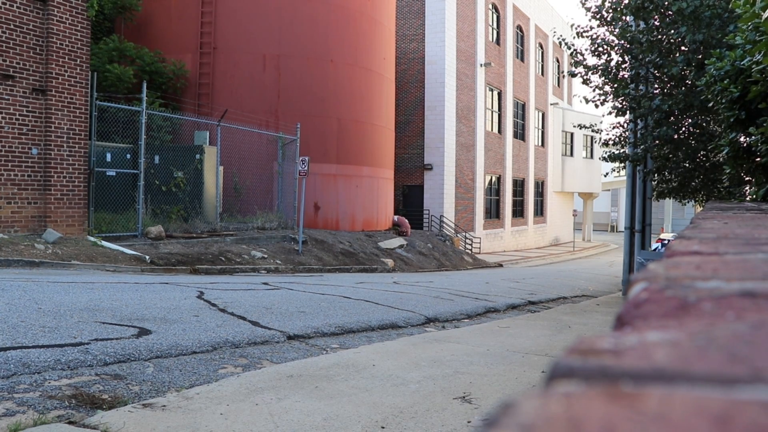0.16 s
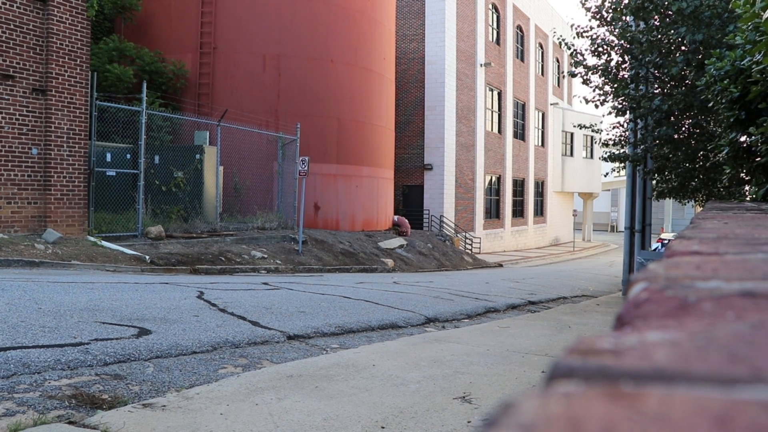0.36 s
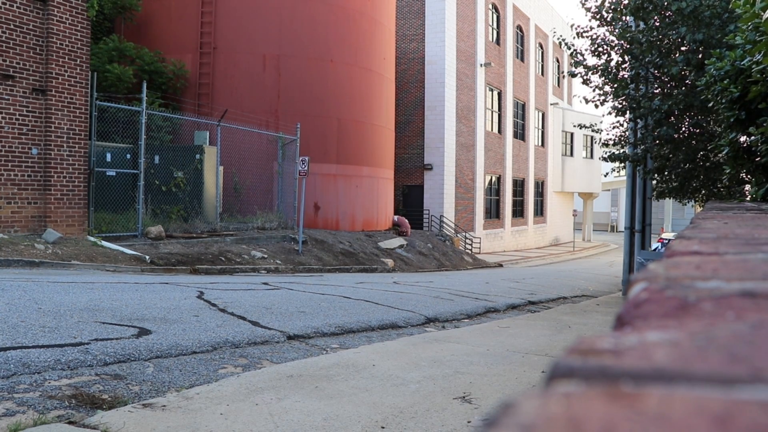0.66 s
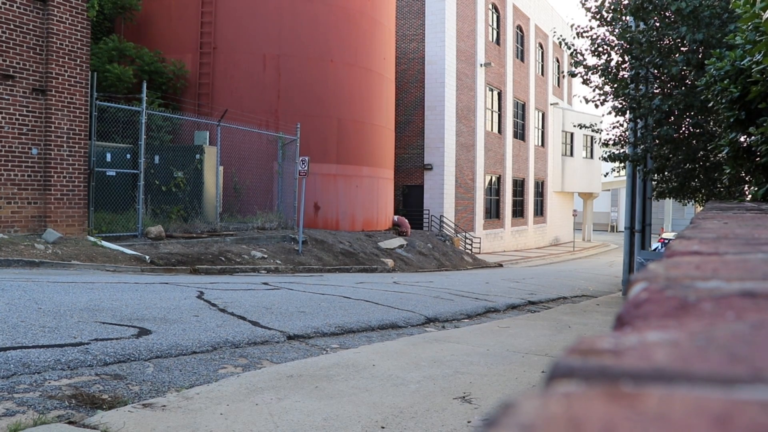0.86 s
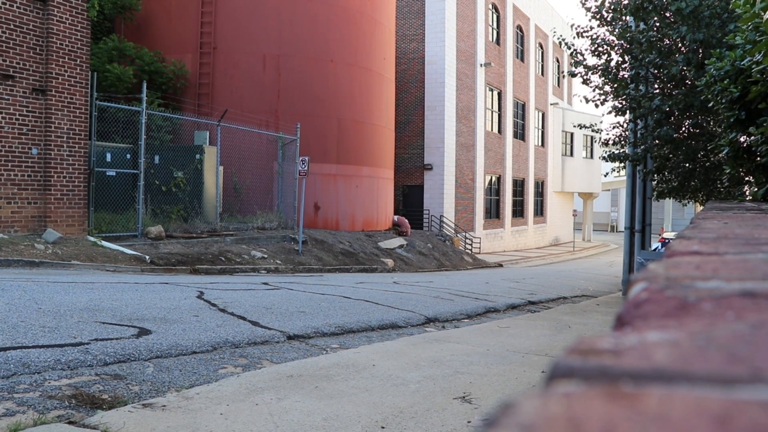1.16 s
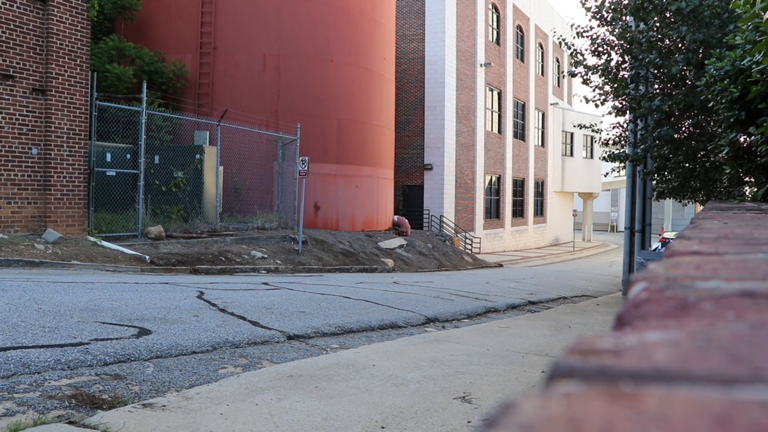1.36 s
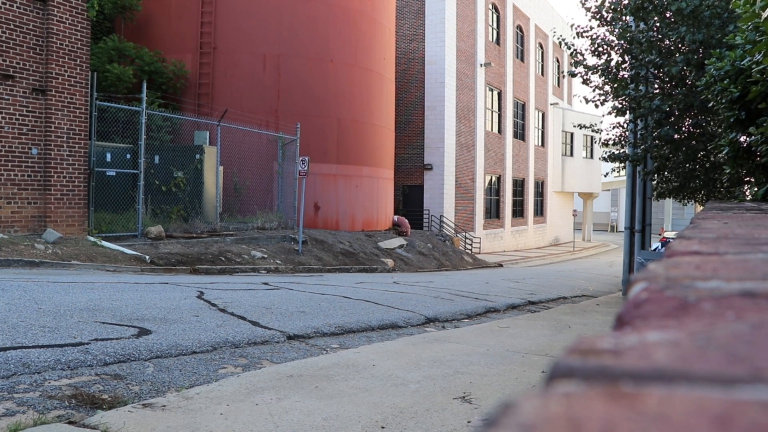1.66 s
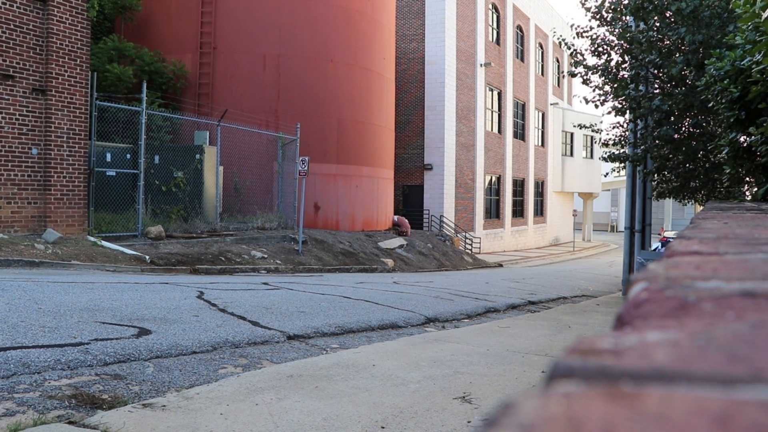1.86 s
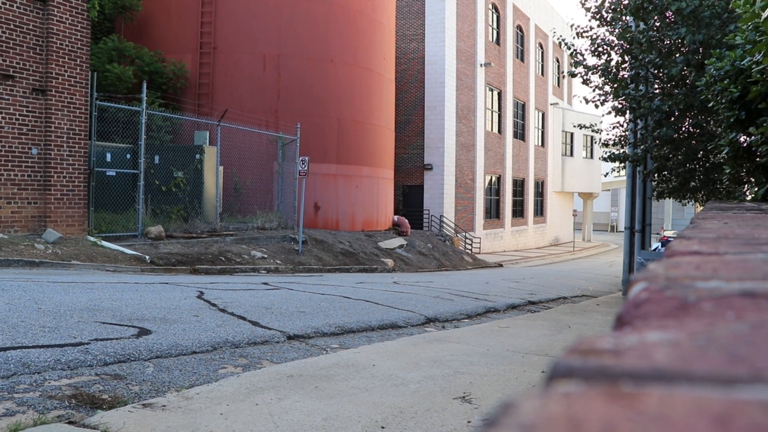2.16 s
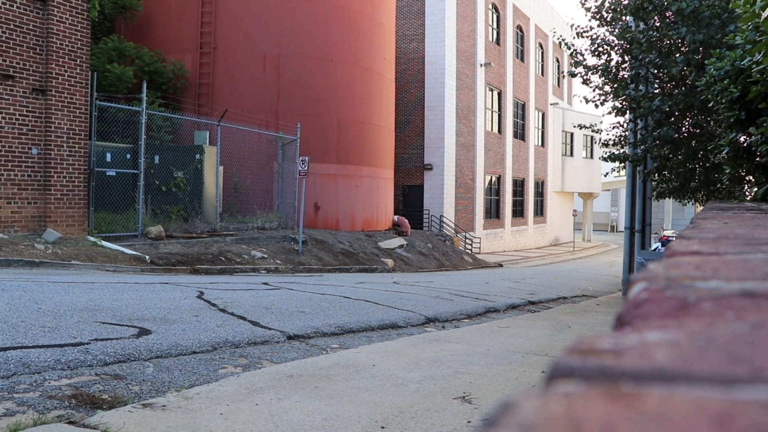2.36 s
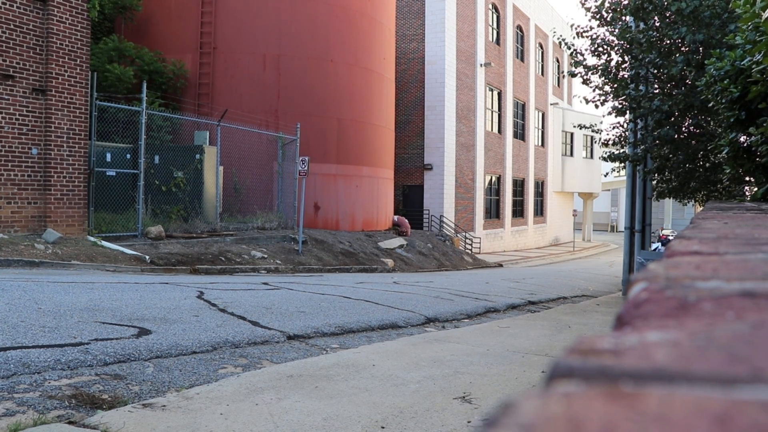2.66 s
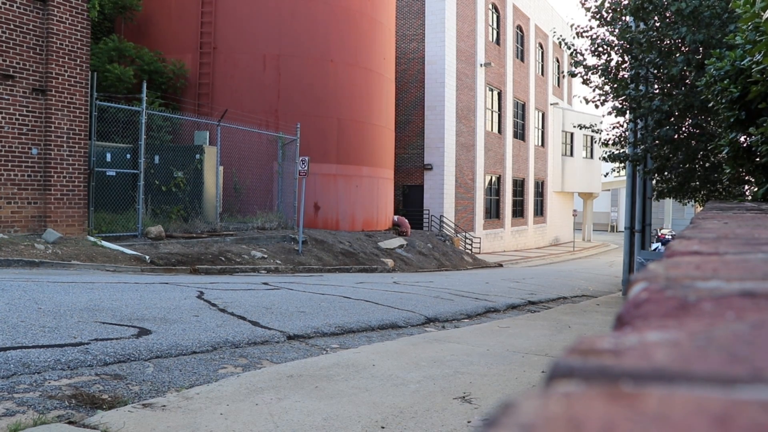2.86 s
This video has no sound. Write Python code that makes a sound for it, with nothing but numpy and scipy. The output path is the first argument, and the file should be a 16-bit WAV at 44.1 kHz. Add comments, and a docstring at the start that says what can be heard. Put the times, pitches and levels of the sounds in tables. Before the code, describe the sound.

An unseen car with a loud exhaust pulls away, its low throbbing drone rising in pitch and loudness, turning raspier near the end, echoing off alley walls over faint machinery hum and small grit clicks.

```python
"""An alley between factory buildings, where an unseen car with a loud exhaust pulls away from low revs.
Its engine orders are climbing sine tones: throb and drone swell and fade by drawn level curves,
the higher ones through fixed resonances of pipe and walls. Pulsed noise makes the gas, which rasps as
the load rises; decaying noise tails make the wall echoes. A little grit cracks and crunches in clicks and
short noise bands, while plant machinery hums and whines in wavering tones over a bed of shaped noise."""
import sys
import numpy as np
from scipy import signal
from scipy.fft import rfft, irfft
from scipy.io import wavfile
from scipy.ndimage import map_coordinates

SR = 44100
rng = np.random.default_rng(int(sys.argv[2]) if len(sys.argv) > 2 else 0)


def wrap_up_sound(samples):
    """Save the sound to the file named by the first command line argument, as 16-bit audio."""
    columns = np.atleast_2d(samples).T
    # keep every value between -1 and 1, then stretch to whole-number steps
    tamed = np.clip(columns, -1, 1)
    steps = np.round(tamed * 32767).astype(np.int16)
    wavfile.write(sys.argv[1], SR, steps)


N = 132300  # samples, 3 s

# Engine speed: (time [s], exhaust beat rate [Hz])
BEAT_RATE = [(0.0, 37.87), (0.3, 39.02), (0.45, 38.73), (0.75, 42.78), (1.05, 47.24), (1.2, 48.56),
             (1.5, 50.4), (1.65, 52.5), (1.8, 53.57), (1.95, 56.1), (2.25, 62.22), (2.55, 68.5),
             (3.0, 80.16)]
# Engine effort, driving the higher orders: (time [s], relative level [dB])
EFFORT = [(0, -12.5), (.8, -8), (1.4, -10.5), (2, -5), (2.4, 0), (2.75, 0), (3, 0)]
# Drawn swells and fades of the throb, the lowest note: (time [s], level [dB])
THROB_LEVEL = [(0, -48), (.61, -40), (1.17, -42), (1.32, -33), (1.46, -47), (1.59, -33), (1.64, -58),
               (1.73, -35), (2.06, -29), (2.15, -46), (2.34, -25.5), (2.43, -53), (2.49, -29.5),
               (2.75, -26.5), (2.85, -33), (3, -24.5)]
# Drawn swells and fades of the drone, an octave above the throb: (time [s], level [dB])
DRONE_LEVEL = [(0, -50), (.09, -43), (.39, -40), (.66, -31.5), (.82, -35), (.9, -31.5), (1.61, -29),
               (1.83, -22), (1.93, -25), (1.98, -35), (2.05, -24.5), (2.13, -32.5), (2.17, -22),
               (2.33, -23), (2.41, -28), (2.47, -17.5), (2.57, -27), (2.64, -16.5), (2.68, -24.5),
               (2.81, -22), (3, -33)]
# Higher engine orders, the halves from unequal cylinders: (multiple of the beat [ratio], relative level [dB])
ENGINE_ORDERS = [(1.5, -4), (2.5, -7.5), (3, 7), (3.5, -8), (4, 7), (4.5, -6.5), (5, 3), (5.5, -6),
                 (6, -2.5), (6.5, -7), (7, -3), (7.5, -8), (8, -4), (9, -8), (10, -8), (11, -8.5),
                 (12, -10)]
# Tilt of the top orders: (time [s], slope [dB per octave])
BRIGHTNESS_TILT = [(0, 0), (2.3, -10.5), (2.6, 3), (3, 5)]
# Resonances of pipe and alley, for the higher orders: (frequency [Hz], gain [dB])
RESONANCES = [(55, -48), (80, -47), (102, -37), (112, -35), (117, -42.5), (122, -34.5), (129, -28),
              (137, -31), (143, -37.5), (147, -29), (153, -32), (158, -42), (162, -34), (168, -39.5),
              (176, -46.5), (190, -59.5), (218, -48), (238, -44.5), (254, -39), (268, -36), (277, -48.5),
              (295, -46), (320, -51), (365, -41), (400, -41.5), (440, -49), (505, -44.5), (560, -52.5),
              (625, -40), (690, -52.5), (900, -67)]
# Colour of the rushing gas: (frequency [Hz], relative level [dB per Hz])
GAS_COLOUR = [(60, 4), (120, 6), (170, -1), (200, 0), (300, -3.5), (375, 8), (450, -7.5), (600, -11),
              (900, -21.5), (1350, -21.5), (2000, -30), (4000, -61.5)]
# Loudness of the rush: (time [s], level [dB])
GAS_RUSH_LEVEL = [(0, -51), (1.4, -54.5), (2, -40), (2.4, -35), (2.75, -37), (3, -33)]
# Colour of the gas rasp: (frequency [Hz], relative level [dB per Hz])
RASP_COLOUR = [(300, -32), (480, 3.5), (680, -4.5), (900, -4), (1350, -3.5), (1800, -16), (2400, -14.5),
               (3800, -22), (5000, -40)]
# Loudness of the rasp: (time [s], level [dB])
GAS_RASP_LEVEL = [(0, -60.5), (1.898, -52), (2.4, -48.5), (2.7, -47.5), (3, -41.5)]
# Grit cracking: (time [s], level before colouring [dB], left over right [dB])
GRIT_CRACKS = [(1.4987, -11, -2), (1.5028, -25, 0), (1.5072, -9, -2), (1.5415, -24, 0)]
# Colour of the cracks: (frequency [Hz], gain [dB])
CRACK_TONE = [(200, -10), (900, 3), (2500, -2), (4000, -8), (5000, -25), (12000, -38)]
# Soft crunches: (time [s], spread [s], centre [Hz], centre to -12 dB [octaves], level [dB])
GRIT_CRUNCHES = [(.612, .011, 1300, .6, -42), (.62, .012, 3200, .5, -57), (.79, .015, 2400, .25, -55),
                 (.92, .008, 2300, .13, -47.5), (.963, .009, 1100, .7, -44.5), (1.43, .008, 2700, .25, -58),
                 (2.87, .006, 2200, .2, -51)]
# Machinery hum: (frequency [Hz], level [dB])
MOTOR_HUM = [(46, -39.5), (120, -49), (168, -47), (377, -54), (479, -55), (823.6, -63), (1222, -61),
             (1302, -65)]
# Thin whine of a fan: (frequency [Hz], relative level [dB])
FAN_WHINE = [(2945, -76), (3832, -72), (3945, -78), (4055, -80), (4167, -80), (4280, -81)]
# Fade of the fan whine: (time [s], gain [dB])
FAN_LEVEL = [(0, 2), (.8, -.5), (1.8, -2), (3, -4)]
# Colour of the yard air: (frequency [Hz], relative level [dB per Hz])
AIR_COLOUR = [(18, -51), (30, -3.5), (85, -7), (140, 2), (156, -24.5), (202, -10.5), (350, -9.5),
              (431, -17.5), (655, -21.5), (828, -21.5), (995, -23.5), (1260, -20), (1400, -24),
              (2550, -36.5), (3580, -38.5), (3970, -42), (4900, -48), (8260, -44.5), (15500, -53.5)]
# Stereo width of air, gas and machinery: (frequency [Hz], side against middle [dB])
SIDE_COLOUR = [(40, -21), (120, -15.5), (300, -13), (600, -5.5), (1200, -4), (2200, 1.5), (4000, 3),
               (6000, 2.5), (15000, -2.7)]

UPPER_DB, BRIGHT_FROM_HZ = 3.5, 330
WAVER_DB, WAVER_RAD = 2.75, .07  # spread of level; spread of phase, times root of the order
FIRING_ROUGH = .04  # spread of the firing strength, as a fraction
LOW_PAN_DB, UPPER_PAN_DB = .5, 1.2  # left over right
GAS_PULSING, GAS_WIDTH_DB = .27, -2  # depth of the puffs, 0 to 1; gain of the side
LOW_ECHO_DB, ALLEY_DB = -4, -10.5  # send of the two low notes; gain of all echoes
ALLEY_T60_S, ALLEY_DELAY_S, ALLEY_WIDE_HZ = 1, .0274, 705
CRACK_TAIL_S, CRACK_TAIL_DB = .01, -31  # decay constant; scatter against the click
CRUNCH_GRAIN = .6  # depth of the random grain, in log amplitude
HUM_WAVER_DB, HUM_WAVER_RAD = .5, .27  # phase wander is for a 100 Hz tone, growing as root frequency
WHINE_WAVER_DB, WHINE_WAVER_RAD = 3, .29
AIR_DB, AIR_FLUTTER_DB = -37, 1.4
LOW_CUT_HZ, TOP_HZ = 37.3, 15500


def amp(db):
    """Decibels to gain."""
    return 10 ** (np.asarray(db) / 20)


def curve(rows):
    """Draw straight lines through (time [s], value) rows, one value a sample."""
    return np.interp(np.arange(N) / SR, *np.array(rows, float).T)


def gain_at(rows, hz):
    """Read gains off a (frequency [Hz], gain [dB]) table, along log frequency."""
    f, db = np.array(rows, float).T
    return amp(np.interp(np.log(np.maximum(hz, 1)), np.log(f), db))


def colour(x, rows):
    """Filter the spectrum by a (frequency [Hz], gain [dB]) table."""
    bins_hz = np.arange(N + 1) * SR / (2 * N)
    spectrum = rfft(x, 2 * N) * gain_at(rows, bins_hz)
    return irfft(spectrum)[..., :N]


def unit(x):
    """Scale to rms 1."""
    return x / np.sqrt(np.mean(x ** 2))


def walk(rate):
    """Smooth random wander with a spread near 1, through `rate` random knots a second."""
    knots = rng.standard_normal(2048)
    return map_coordinates(knots, [np.arange(N) / SR * rate + 2], order=2, mode="mirror")


def stereo(mid, side):
    """Left and right from middle and side."""
    return np.array([mid + side, mid - side])


def pan(db):
    """Left and right gains, with the left `db` above the right."""
    return amp(np.array([[db], [-db]]) / 2)


def exhaust(hz, phase):
    """Throb and drone follow drawn levels; higher orders rise through fixed resonances and a moving tilt."""
    firing = 1 + FIRING_ROUGH * walk(70)
    throb = amp(curve(THROB_LEVEL)) * np.sin(phase)
    drone = amp(curve(DRONE_LEVEL)) * np.sin(2 * phase + rng.uniform(0, 2 * np.pi))
    effort_db = curve(EFFORT) + UPPER_DB
    tilt_per_octave = curve(BRIGHTNESS_TILT)
    upper = 0
    for order, db in ENGINE_ORDERS:
        start = rng.uniform(0, 2 * np.pi)
        waver = WAVER_RAD * np.sqrt(order) * walk(22.004)
        tone = np.sin(order * phase + start + waver)
        octaves_above = np.maximum(np.log2(order * hz / BRIGHT_FROM_HZ), 0)
        level_db = db + effort_db + tilt_per_octave * octaves_above + WAVER_DB * walk(14)
        upper = upper + amp(level_db) * gain_at(RESONANCES, order * hz) * tone
    return (throb + drone) * firing, upper * firing


def gas(phase):
    """Turbulent gas leaves the tailpipe as noise in puffs, one a beat, and rasps higher up under load."""
    puffs = 1 + GAS_PULSING * np.cos(phase)
    out = 0
    for rows, level in ((GAS_COLOUR, GAS_RUSH_LEVEL), (RASP_COLOUR, GAS_RASP_LEVEL)):
        mid, side = (unit(colour(rng.standard_normal(N) * puffs, rows)) for _ in range(2))
        side = colour(side, SIDE_COLOUR) * amp(GAS_WIDTH_DB)
        out = out + stereo(mid, side) * amp(curve(level))
    return out


def alley(x):
    """Dense wall echoes as decaying noise tails, alike in both ears in the bass and wider above."""
    t = np.arange(N) / SR
    tails = rng.standard_normal((2, N)) * amp(-60 * t / ALLEY_T60_S) * (t > ALLEY_DELAY_S)
    mid, side = (signal.fftconvolve(x, unit(tail) / np.sqrt(N))[:N] for tail in tails)
    side = colour(side, [(110, -11), (ALLEY_WIDE_HZ, 4)])
    return amp(ALLEY_DB) * stereo(mid, side)


def crack(at, db, pan_db):
    """Grit snaps as a single click followed by a short, decaying scatter of noise."""
    t = np.arange(N) / SR
    decay = (t > at) * np.exp(-abs(t - at) / CRACK_TAIL_S)
    hit = amp(CRACK_TAIL_DB) * rng.standard_normal((2, N)) * decay
    hit[:, int(at * SR)] += 1  # the click
    return amp(db) * pan(pan_db) * hit


def crunch(at, spread, hz, octaves, db):
    """Grit scrapes as a band of unevenly grained noise under a bell-shaped swell."""
    t = np.arange(N) / SR
    grains = rng.standard_normal((2, N)) * np.exp(CRUNCH_GRAIN * walk(500))
    r = 2 ** octaves
    band_shape = [(hz / r ** 3, -50), (hz / r, -12), (hz, 0), (hz * r, -12), (hz * r ** 3, -50)]
    swell = np.exp(-.5 * ((t - at) / spread) ** 2)
    return amp(db) * unit(colour(grains, band_shape)) * swell


def grit():
    """Sharp cracks share one colour; softer grainy crunches each have their own band."""
    cracks = sum(crack(*row) for row in GRIT_CRACKS)
    crunches = sum(crunch(*row) for row in GRIT_CRUNCHES)
    return colour(cracks, CRACK_TONE) + crunches


def machine_tones(rows, waver_rad, waver_db):
    """Steady machine pitches as sines wavering in phase and level, with the side out of step."""
    t = np.arange(N) / SR
    out = 0
    for hz, db in rows:
        wander = waver_rad * (hz / 100) ** .5 * walk(5.06)
        phase = 2 * np.pi * (hz * t + rng.uniform()) + wander
        level = np.sqrt(2) * amp(db + waver_db * walk(6.73))  # root 2 makes the level rms
        side = gain_at(SIDE_COLOUR, hz) * np.cos(phase + .5 * walk(3))
        out = out + level * stereo(np.sin(phase), side)
    return out


def machinery():
    """Motors hum and a fan whines; the high tones reach the two ears out of step."""
    hum = machine_tones(MOTOR_HUM, HUM_WAVER_RAD, HUM_WAVER_DB)
    whine = machine_tones(FAN_WHINE, WHINE_WAVER_RAD, WHINE_WAVER_DB)
    return hum + amp(curve(FAN_LEVEL)) * whine


def air():
    """Distant town noise and a fine hiss, both shaped from noise; the midrange flutters."""
    mid, side = (unit(colour(rng.standard_normal(N), AIR_COLOUR)) for _ in range(2))
    out = amp(AIR_DB) * stereo(mid, colour(side, SIDE_COLOUR))
    midrange = colour(out, [(400, -33), (700, -2.5), (1600, 1.5), (3000, -13)])
    flutter = amp(AIR_FLUTTER_DB * walk(22.02)) - 1
    return out + midrange * flutter


def scene():
    """Mix the car and its echoes over the grit, machinery and air of the yard."""
    hz = curve(BEAT_RATE)
    phase = 2 * np.pi * np.cumsum(hz) / SR
    low, upper = exhaust(hz, phase)
    echoes = alley(upper + amp(LOW_ECHO_DB) * low)
    car = pan(LOW_PAN_DB) * low + pan(UPPER_PAN_DB) * upper + echoes + gas(phase)
    return car + grit() + machinery() + air()


def record(dry):
    """The recorder cuts the deepest bass and the top."""
    low_cut = signal.butter(4, LOW_CUT_HZ, "high", fs=SR, output="sos")
    top_cut = signal.ellip(10, .2, 80, TOP_HZ, fs=SR, output="sos")
    return signal.sosfilt(top_cut, signal.sosfilt(low_cut, dry))


dry = scene()
out = record(dry)
wrap_up_sound(out)
```